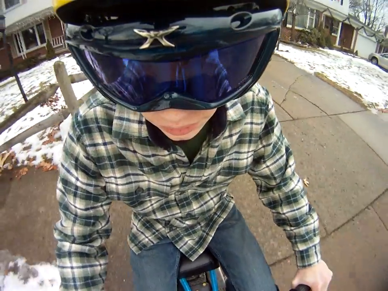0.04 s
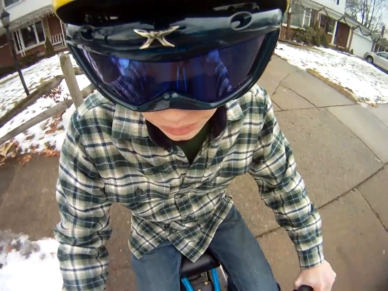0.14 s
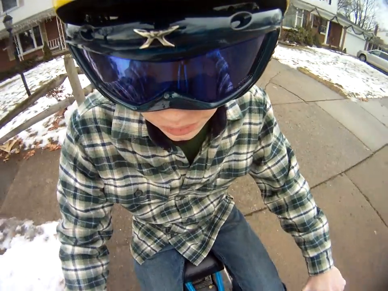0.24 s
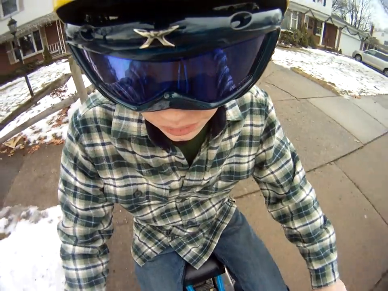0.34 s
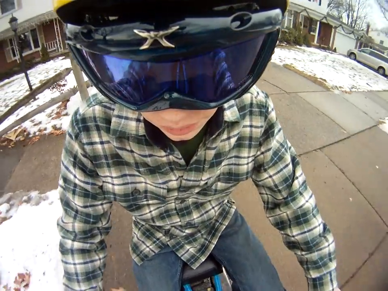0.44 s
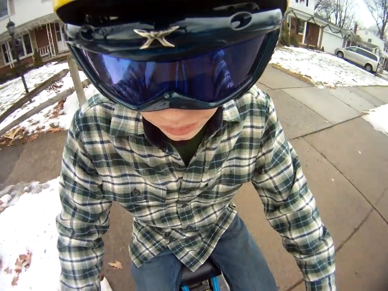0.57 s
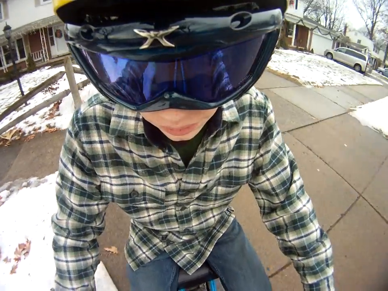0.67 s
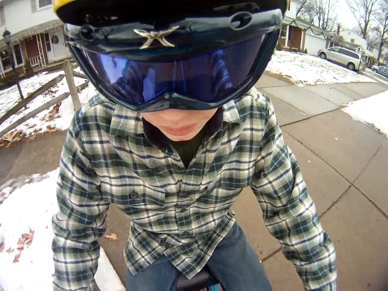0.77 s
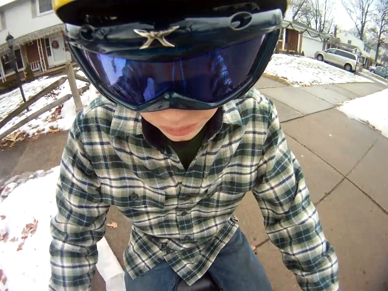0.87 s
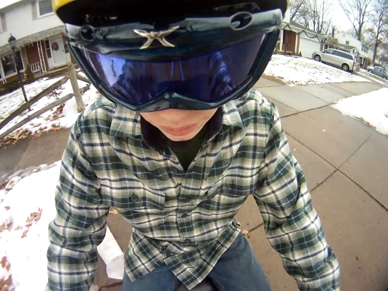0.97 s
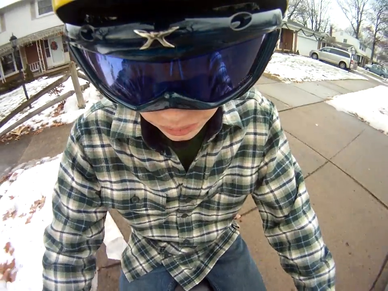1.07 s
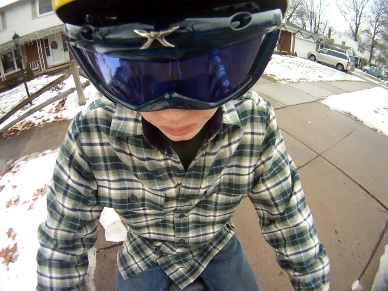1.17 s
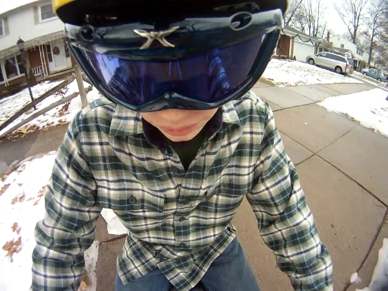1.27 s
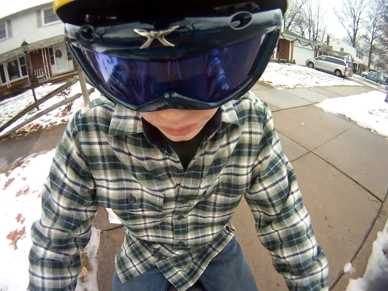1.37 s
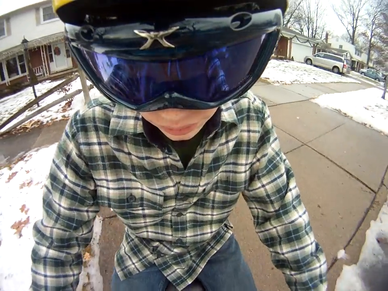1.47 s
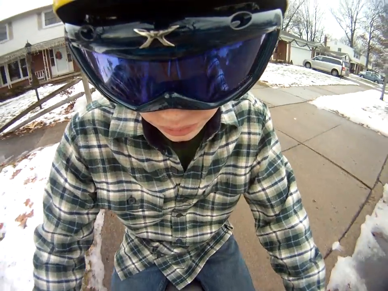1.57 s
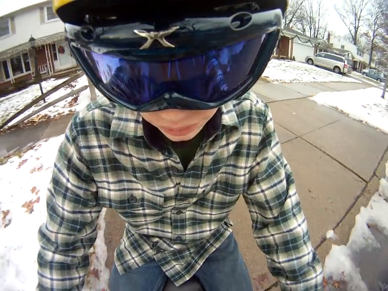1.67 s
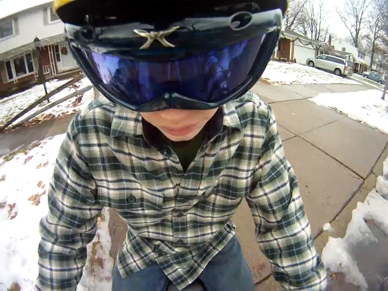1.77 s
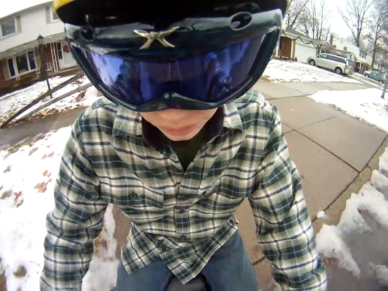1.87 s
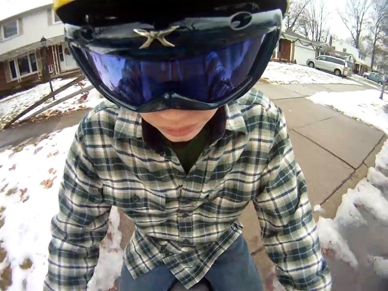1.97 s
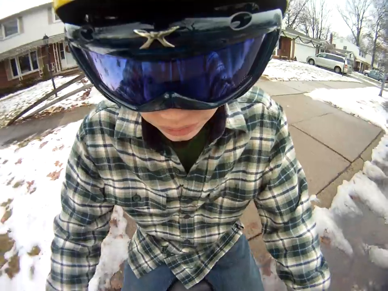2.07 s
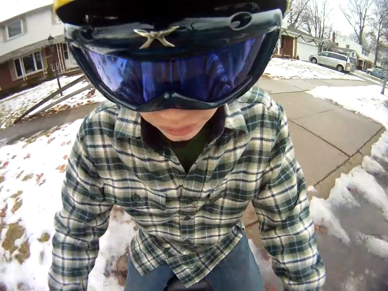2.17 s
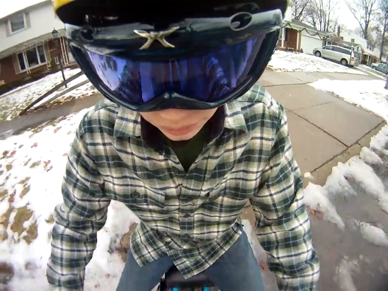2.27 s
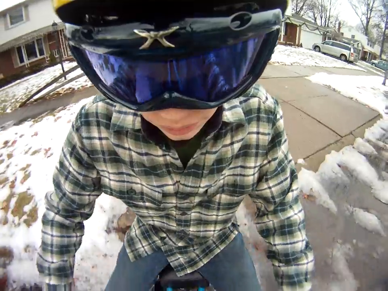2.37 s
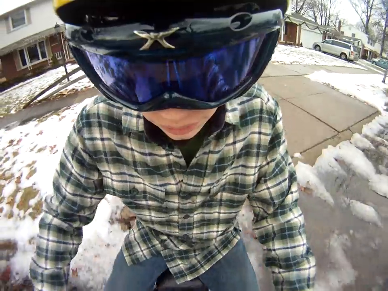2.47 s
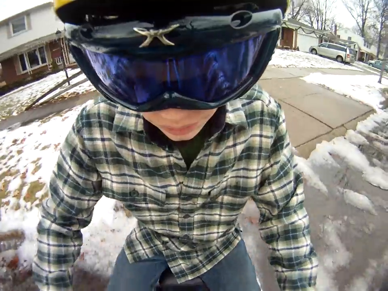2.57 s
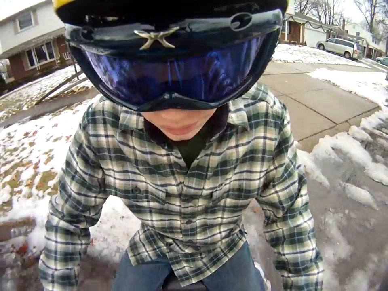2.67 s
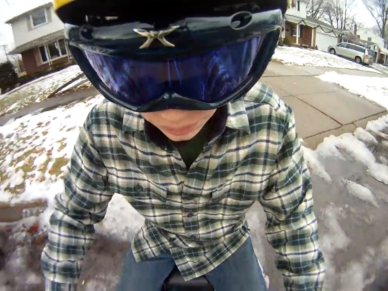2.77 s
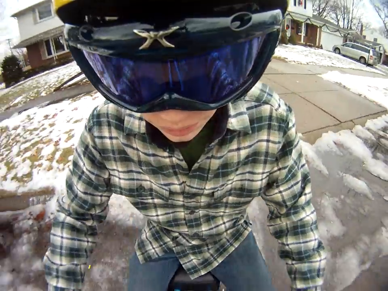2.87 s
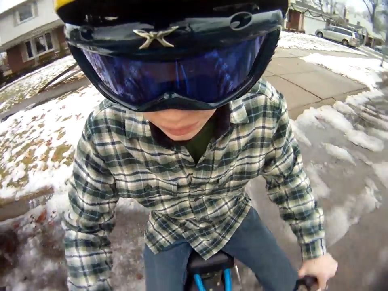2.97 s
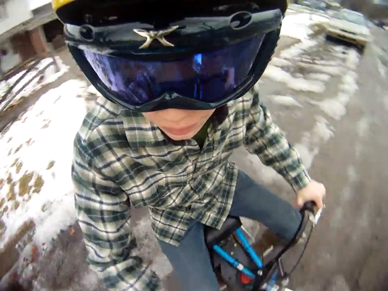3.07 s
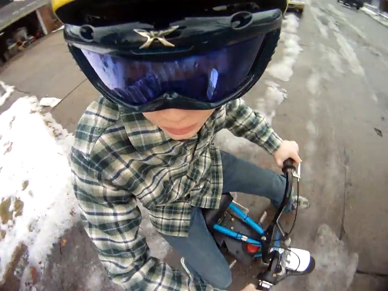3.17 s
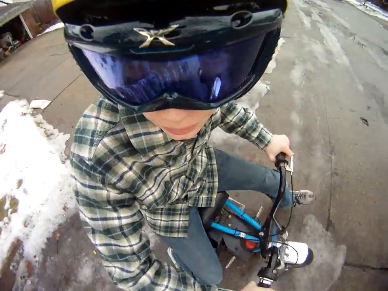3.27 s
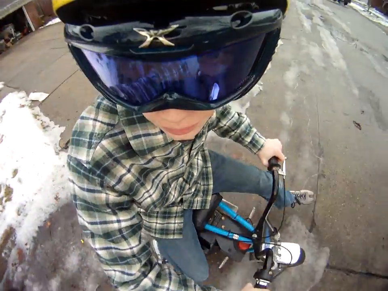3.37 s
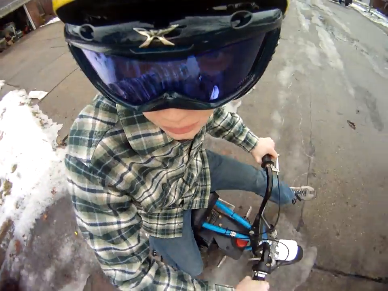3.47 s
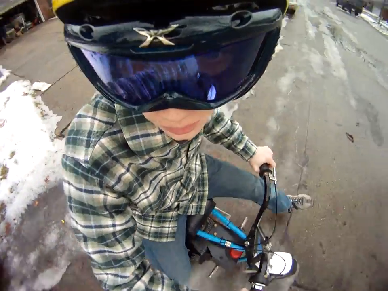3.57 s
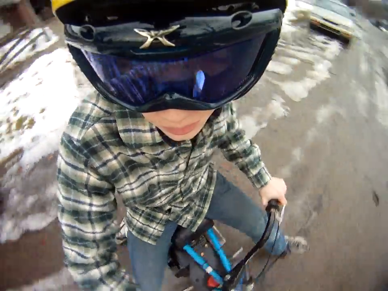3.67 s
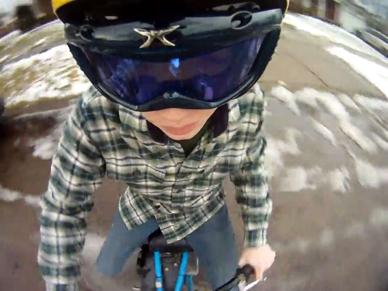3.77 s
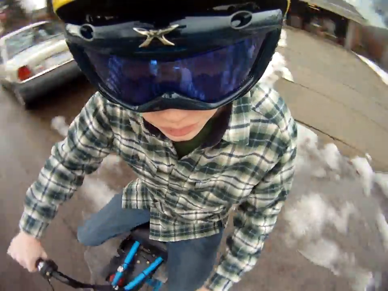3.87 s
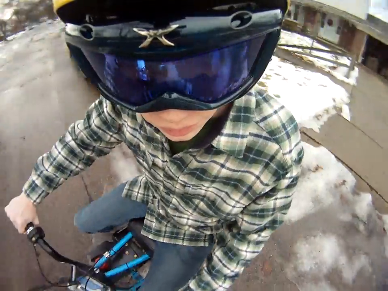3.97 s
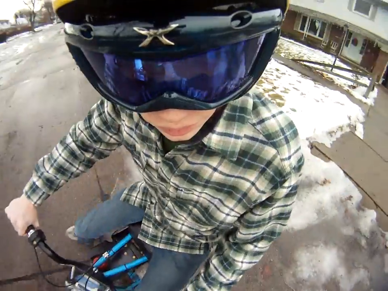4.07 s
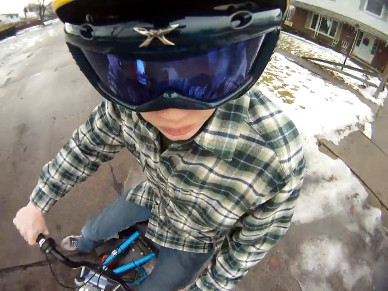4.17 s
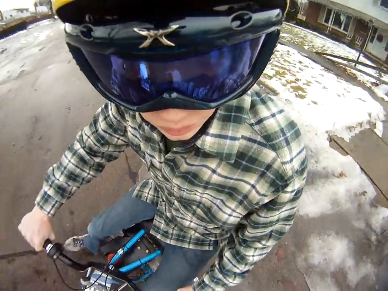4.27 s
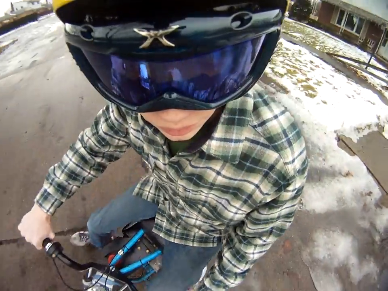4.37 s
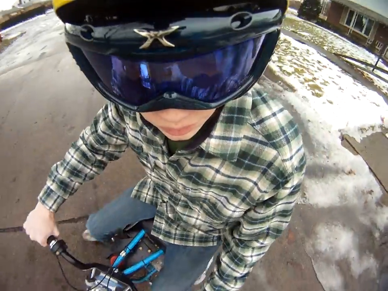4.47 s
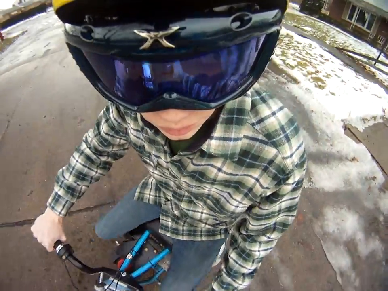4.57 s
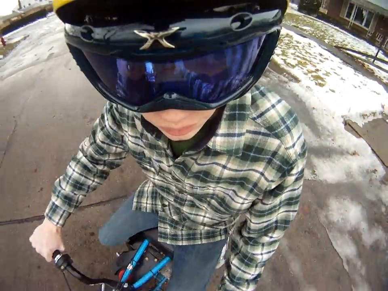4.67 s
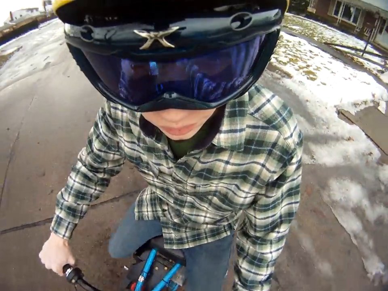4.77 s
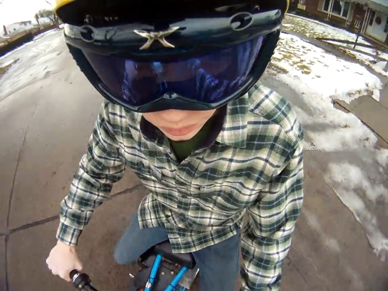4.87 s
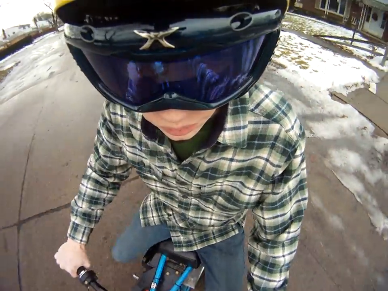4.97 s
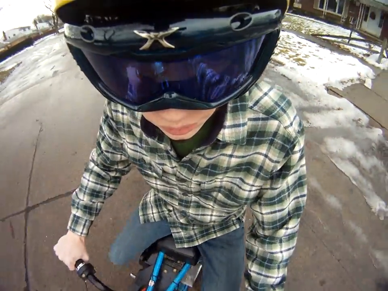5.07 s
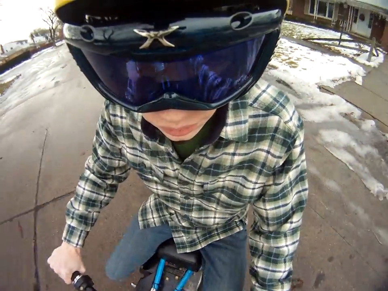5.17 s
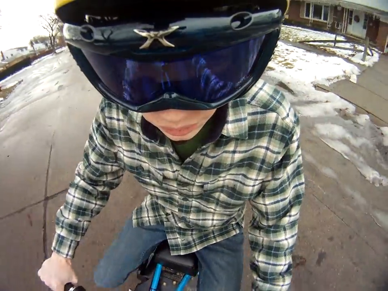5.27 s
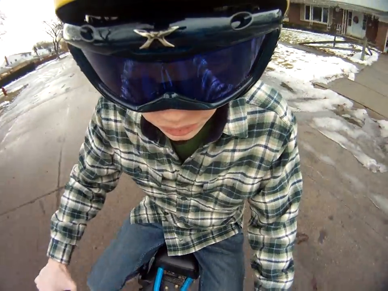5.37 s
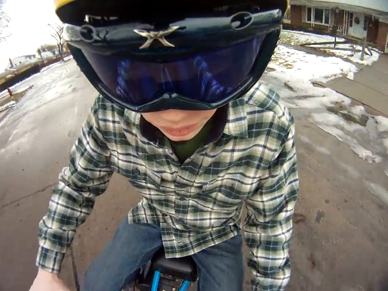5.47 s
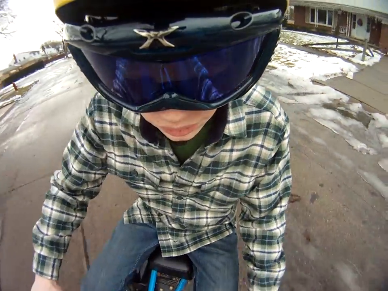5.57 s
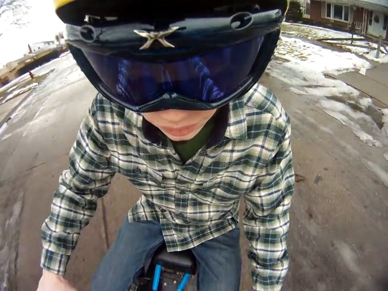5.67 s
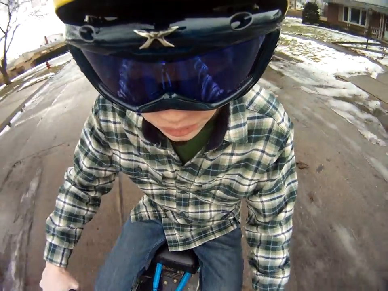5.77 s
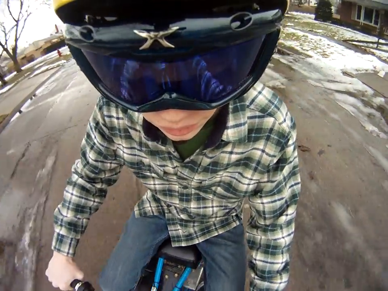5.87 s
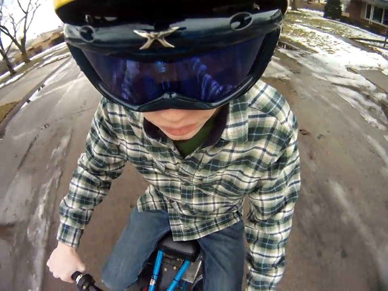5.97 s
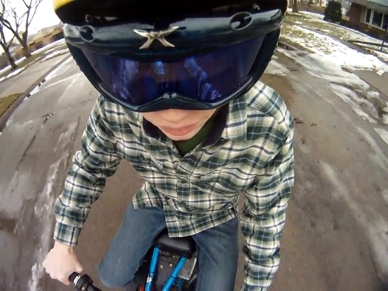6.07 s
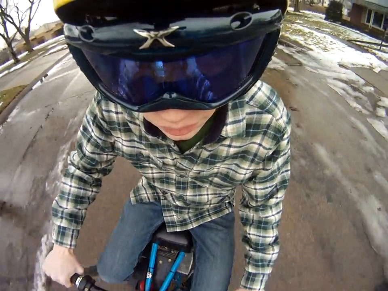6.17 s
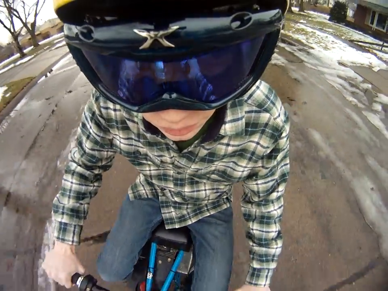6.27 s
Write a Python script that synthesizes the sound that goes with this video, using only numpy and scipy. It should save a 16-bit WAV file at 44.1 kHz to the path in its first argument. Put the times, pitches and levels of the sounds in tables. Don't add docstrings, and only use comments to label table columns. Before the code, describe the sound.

A small one-cylinder minibike is heard very close through a sealed camera shell on a helmet arm: dull low shaking, tinny valve ticks and firing knocks, soft exhaust puffs and a grainy digital edge. From 0 s its beat drops from about sixteen to twelve per second, with a bright tap at 0.1 s. Faint, nearly pure brake squeaks and a lower groan come around 0.2-0.35 s, more chirps at 0.6-0.7 s. The idle then limps at nine to eleven beats per second, stumbling near 0.9, 1.4 and 2.0 s. At 2.54 s a loud hard plastic knock hits with a deep, decaying wobble, followed by small taps and lesser shakes until 3.2 s. From 3.6 s the engine pulls, climbing to about twenty-two beats per second by 4.4 s, louder, raspier and more even. A faint bright tap comes at 4.6 s; the pitch eases slightly and drones on to 6.3 s.

```python
import sys
import numpy as np
from scipy import signal
from scipy.fft import rfft, irfft
from scipy.io import wavfile
from scipy.ndimage import uniform_filter1d

SR = 44100
rng = np.random.default_rng(int(sys.argv[2]) if len(sys.argv) > 2 else 0)


def int16_out(signal):
    q = np.round(np.clip(np.atleast_2d(signal).T, -1, 1) * 32767)
    wavfile.write(sys.argv[1], SR, q.astype(np.int16))


def volts_from_db(level):
    exponent = np.asarray(level, float) / 20
    return 10 ** exponent


N = 279153
TIME = np.arange(N) / SR


def unit(x):
    return x / np.sqrt(np.mean(x ** 2))


def steady(x, span_s):
    return x / np.sqrt(uniform_filter1d(x ** 2, int(span_s * SR)))


def curves(table):
    time_s, *columns = np.transpose(table)
    return [np.interp(TIME, time_s, column) for column in columns]


def band(x, hz, width_hz):
    return signal.lfilter(*signal.iirpeak(hz, hz / width_hz, SR), x)


def butter(x, order, hz, kind="low"):
    return signal.sosfilt(signal.butter(order, hz, kind, fs=SR, output="sos"), x)


def noise():
    return rng.standard_normal(N)


def ring(start_s, hz, t60_s):
    t = np.maximum(TIME - start_s, 0)
    return np.sin(2 * np.pi * hz * t) * np.exp(-np.log(1000) * t / t60_s)


def knocks():
    # start_s, peak_db, push_s, centre_hz, spread_octaves
    contacts = [
        (2.5385, -8, .0055, 2000, 3),
        (.113, -27, .007, 3500, .25),
        (2.592, -39, .003, 900, .3),
        (2.645, -33, .005, 2000, .15),
        (3.152, -38, .002, 1000, .4),
        (4.128, -32, .002, 1200, .3),
        (2.5382, -18, .003, 4000, .6),
        (4.6, -29, .005, 5000, .12),
    ]
    # mode_hz, level_db, t60_s
    shell = [(660, -19, .03), (780, -14, .05), (950, -9, .03), (1220, -6, .03), (1610, -11, .02),
             (1980, 6, .014), (2450, -5, .012), (3000, -3, .01), (3670, -9, .012), (4470, -13, .012),
             (5000, -15, .01)]
    out = 0
    for start_s, peak_db, push_s, centre_hz, octaves in contacts:
        t = np.linspace(0, 1, int(max(push_s, .001) * SR))
        contact = np.minimum(0.1 + t, 4 - 4 * t) * rng.standard_normal(len(t))
        modes = 0
        for hz, mode_db, t60_s in shell:
            reach_db = -6 * (np.log2(hz / centre_hz) / octaves) ** 2
            modes = modes + volts_from_db(mode_db + reach_db) * ring(0, hz, t60_s)[:4000]
        hit = butter(np.convolve(contact, modes), 3, 600, "high")
        hit = volts_from_db(peak_db) * hit / np.abs(hit).max()
        out = out + np.pad(hit, (int(start_s * SR), N))[:N]
    return out


def squeak(start_s, length_s, first_hz, last_hz, peak_db, overtone_db):
    press_hz, press_db, late_skew = 109, 38, 1.06
    done = np.clip((TIME - start_s) / length_s, 0, 1)
    press = np.sin(np.pi * done ** late_skew)
    pitch_hz = first_hz + (last_hz - first_hz) * done + press_hz * press
    phase = 2 * np.pi * np.cumsum(pitch_hz) / SR
    tremble = 1 + 0.31 * unit(band(noise(), 69, 79))
    bite = np.minimum(10 * press, 1) * volts_from_db(peak_db - press_db * (1 - press) ** 2)
    return np.sqrt(2) * bite * tremble * (np.sin(phase) + volts_from_db(overtone_db) * np.sin(2 * phase))


def brakes():
    # start_s, length_s, first_hz, last_hz, peak_db
    squeaks = [
        (0.176, 0.044, 4610, 4720, -36),
        (0.208, 0.045, 4360, 4360, -38.5),
        (0.244, 0.063, 4330, 4610, -38),
        (.304, .025, 4400, 4300, -56),
        (.578, .02, 4600, 4300, -45.5),
        (.605, 0.07, 4230, 5040, -41.5),
        (0.661, 0.019, 4780, 4630, -47),
    ]
    # start_s, length_s, first_hz, last_hz, peak_db
    groan = (.264, .074, 2640, 2680, -35)
    return sum(squeak(*row, overtone_db=-60) for row in squeaks) + squeak(*groan, overtone_db=-22)


def arm(cycle, load, effort_db):
    # time_s, swing_db
    swing = [(0, -38), (.3, -37), (.8, -27), (1.0, -35), (1.2, -37), (1.45, -32), (2.0, -32), (2.25, -41),
             (2.8, -25.5), (3.2, -39), (3.6, -43.5), (3.85, -35.5), (4.2, -34), (4.42, -39), (4.8, -34),
             (5.5, -28.5), (5.9, -29), (6.33, -27.5)]
    # start_s, peak_db, swing_hz, t60_s
    jolt_table = [
        (2.539, -6.5, 26.5, .36),
        (2.54, -24, 140, .13),
        (2.545, -27, 68, .2),
        (2.541, -40, 330, .05),
        (2.61, -41, 300, .08),
        (2.74, -23, 25, .45),
        (3.085, -20, 25, .18),
    ]
    crank_db, = curves(swing)
    fire_db = -50.5 + 12.5 * load + 0.76 * effort_db
    road_db = -39 + 4.5 * load + 0.64 * (crank_db - crank_db.mean() + 1)
    fire = np.sqrt(2) * np.cos(2 * np.pi * (cycle + 0.3))
    crank = np.sqrt(2) * np.cos(4 * np.pi * (cycle + 0.031 + 0.14 * load))
    road = steady(butter(band(noise(), 28, 10), 8, 38), 0.129)
    jolts = 0
    for start_s, peak_db, hz, t60_s in jolt_table:
        foam = np.tanh((TIME - start_s) / .006)
        jolts = jolts + volts_from_db(peak_db) * ring(start_s, hz, t60_s) * foam
    return volts_from_db(fire_db) * fire + volts_from_db(crank_db) * crank + volts_from_db(road_db) * road + jolts


def blows(cycle, beat_db, load, gas_db):
    def at(share, shape):
        count = np.floor(cycle - share)
        beats = np.diff(count, prepend=count[0]) * volts_from_db(beat_db)
        return signal.fftconvolve(beats, shape, "same")

    trip = int(0.0034 * SR)
    pipe = np.r_[1, np.zeros(trip - 1), .6]
    soft = np.hanning(int(0.0057 * SR))
    idling = butter(signal.lfilter([1], pipe, at(0, soft)), 2, 55, "high")
    sharp = np.hanning(int(.0038 * SR))
    pair = at(0, sharp) + .7 * at(.19, sharp)
    pulling = signal.sosfiltfilt(signal.butter(2, 66, "high", fs=SR, output="sos"), pair)
    heave = np.cos(6 * np.pi * cycle - 1.5)
    loaded = (volts_from_db(-33.5) + volts_from_db(gas_db + 14)) * pulling + volts_from_db(-49) * heave
    return volts_from_db(-35.5) * (1 - load) * idling + load * loaded


def exhaust(cycle, beat_db, load, gas_db):
    # mode_hz, width_hz, level_db
    muffler = [(295, 190, -1.5), (437, 130, -0.5), (656, 195, 5), (732, 96, 0.5), (930, 47, -6)]
    puff = .5 + np.exp(-((cycle + 0.067) % 1) / 0.6)
    gas = 0
    for hz, width_hz, mode_db in muffler:
        gas = gas + volts_from_db(mode_db + 4 * load * (hz < 500)) * band(puff * noise(), hz, width_hz)
    drone = steady(band(noise(), 430, 12), .03) + volts_from_db(-7) * steady(band(noise(), 862, 12), .04)
    drone = drone * (1 + 0.43 * np.cos(4 * np.pi * (cycle - .26)))
    rumble = band(band(puff * noise(), 75, 90), 75, 90)
    out = blows(cycle, beat_db, load, gas_db) + volts_from_db(gas_db) * unit(gas)
    return out + volts_from_db(-62.5 - 6 * load) * drone + volts_from_db(-56 + 5 * load) * unit(rumble)


def clatter(cycle, beat_db, load, treble_db):
    # start_cycles (from the beat), idle_db, load_db, decay_cycles, centre_hz, spread_octaves
    strokes = [
        (-.232, 2, 6.5, .12, 2350, .26),
        (-.055, 1, 2, .13, 3100, .4),
        (-.01, 2, 2, .07, 4950, .08),
        (.15, -5, -6, .08, 3800, .5),
        (.28, -2, -5, .09, 2400, .4),
        (-.12, -12, -1, .3, 1480, .12),
    ]
    # mode_hz, width_hz, level_db
    tin = [(1346, 270, -5.5), (1479, 210, -12), (1911, 118, -4), (2076, 205, -2), (2412, 236, -7),
           (2666, 157, -2), (2995, 156, -3.5), (3510, 490, -10), (3688, 37, -5.5), (4126, 97, -13),
           (4998, 694, -8), (5607, 260, -8)]
    out = 0
    blows_db = 1.5 * rng.standard_normal((len(strokes), 128))
    for hz, width_hz, mode_db in tin:
        gate = volts_from_db(-9 - 2 * load)
        for (start, idle_db, load_db, decay, centre_hz, octaves), blow_db in zip(strokes, blows_db):
            beat, since = np.divmod(cycle + 2 - start, 1)
            scatter_db = (blow_db + 3 * rng.standard_normal(128))[beat.astype(int)]
            scatter_db = scatter_db * (1 - .5 * load)
            fired_db = 0.81 * beat_db * (start < -.1)
            reach = np.exp(-.5 * (np.log2(hz / centre_hz) / octaves) ** 2)
            burst = (1 - np.exp(-since / .008)) * np.exp(-(since / decay) ** 2)
            stroke_db = idle_db + load * (load_db - idle_db) + scatter_db + fired_db
            gate = gate + reach * volts_from_db(stroke_db) * burst
        grainy = noise() * volts_from_db(1.2 * rng.exponential(size=N))
        once = band(gate * grainy, hz, 1.22 * width_hz)
        twice = band(once, hz, 1.22 * width_hz)
        out = out + volts_from_db(mode_db + treble_db * (hz > 4300)) * twice
    return steady(out, 0.634)


def scene():
    # time_s, speed_hz (four-stroke cycles)
    speed_table = [(0, 15.91), (.16, 12.3), (.85, 11.19), (.95, 9.06), (1.04, 10.13), (1.75, 11.04),
                   (2.37, 10.36), (2.71, 11.64), (2.98, 11.28), (3.58, 12.72), (3.93, 18.3), (4.42, 22.04),
                   (4.52, 20.7), (5.41, 18.88), (5.61, 19.33), (6.33, 19.23)]
    # time_s, effort_db (over idling), firing_db
    throttle = [(0, 1.5, -9), (.27, 0, -2), (.8, -1, -5), (1.7, 0, -4.5), (2.45, -1.5, -6), (2.7, 1, -3),
                (3.2, -0.5, -3), (3.52, -0.5, 1), (3.65, 2.5, 4), (3.79, 6.5, 2), (3.95, 5, -4),
                (4.25, 6, -4.5), (4.5, 8, -0.5), (5.0, 7, -2), (5.17, 3, -5), (5.5, 6, -3.5),
                (6.05, 4.5, -4.5), (6.33, 6.5, -1.5)]
    # time_s, change_db
    misfires = [
        (.107, -7),
        (.354, -7),
        (.518, -4),
        (.869, -12),
        (1.074, -9),
        (1.363, -15),
        (2.012, -15),
    ]
    speed_hz, = curves(speed_table)
    cycle = np.cumsum(speed_hz) / SR - .573
    effort_db, beat_db = curves(throttle)
    for time_s, change_db in misfires:
        beat_db = beat_db + change_db * np.clip(1 - np.abs(TIME - time_s) * speed_hz, 0, 1)
    load = np.clip((uniform_filter1d(speed_hz, SR // 8) - 12.5) / 6.6, 0, 1)
    tin = volts_from_db(-45.5 + effort_db) * clatter(cycle, beat_db, load, treble_db=-4 + .45 * effort_db)
    engine = tin + exhaust(cycle, beat_db, load, gas_db=-62.5 + 1.51 * effort_db)
    return (engine + arm(cycle, load, effort_db) + brakes() + knocks())[None]


def band_limit(x):
    return signal.sosfilt(signal.butter(12, 16450, fs=SR, output="sos"), x)


def record(dry):
    hold_hz = 12000
    x = butter(dry[0], 6, 5600)
    period = round(hold_hz * N / SR)
    bins = np.arange(N // 2 + 1)
    folded = (bins + period // 2) % period - period // 2
    spectrum = rfft(x)[np.abs(folded)]
    spectrum = np.where(folded < 0, spectrum.conj(), spectrum)
    spectrum = spectrum * np.sinc(bins / period) / np.sinc(bins / period / 4)
    spectrum /= 1 + (bins * SR / N / 15450) ** 120
    return band_limit(irfft(spectrum, N)[None])


dry = scene()
out = record(dry)
int16_out(out)
```